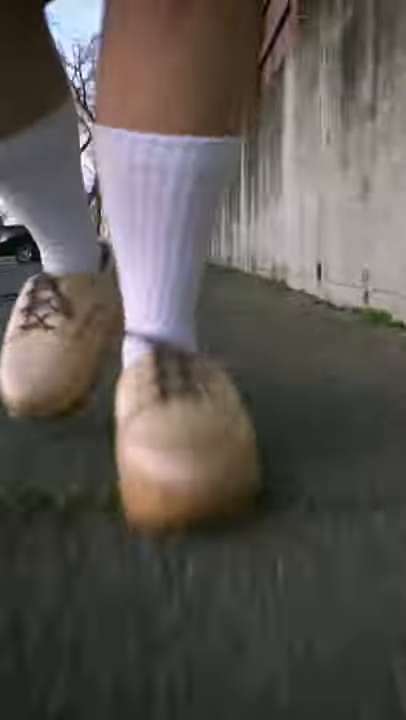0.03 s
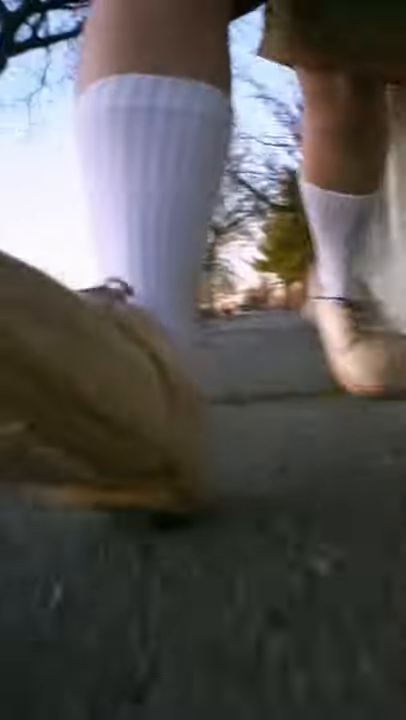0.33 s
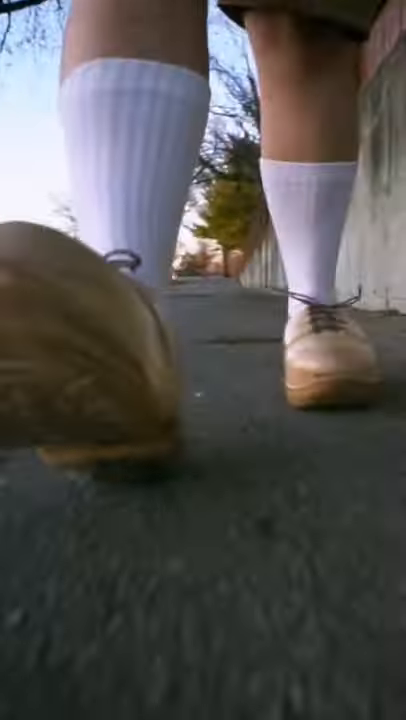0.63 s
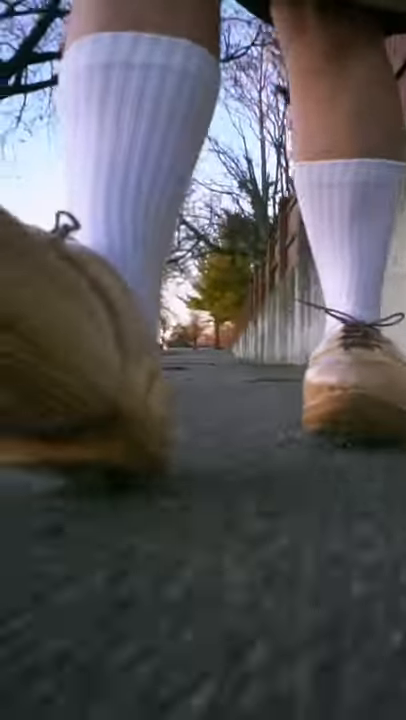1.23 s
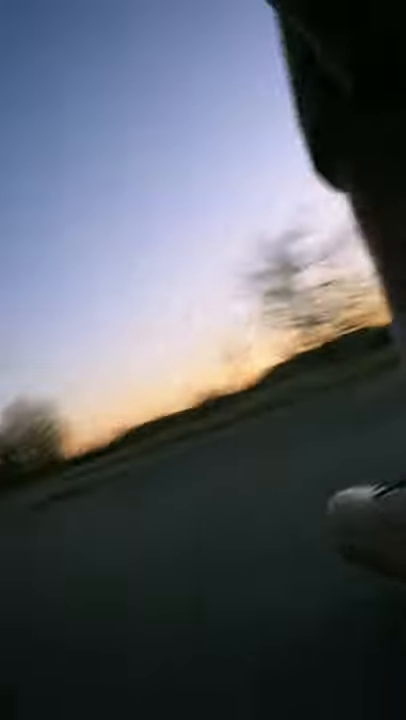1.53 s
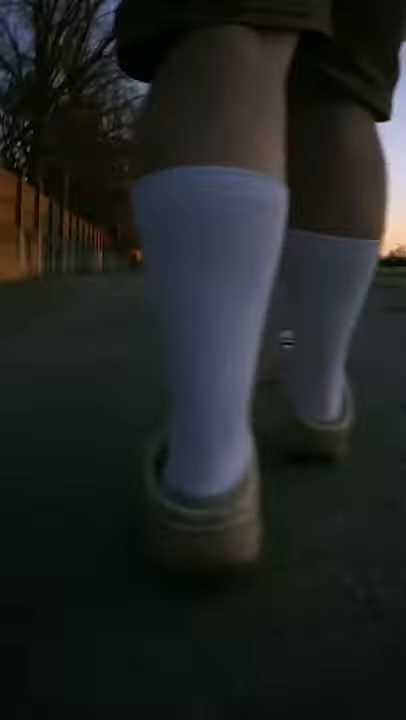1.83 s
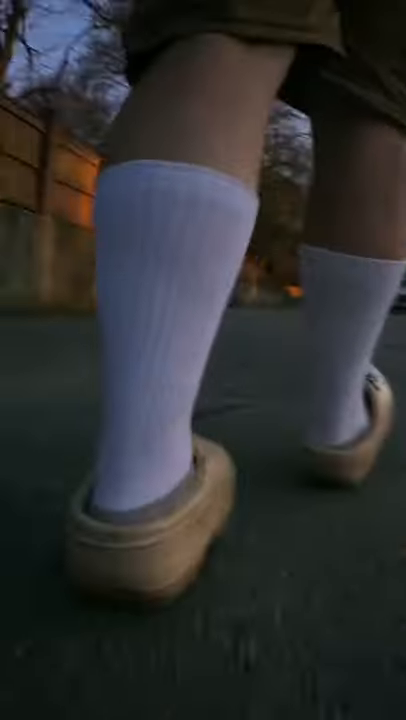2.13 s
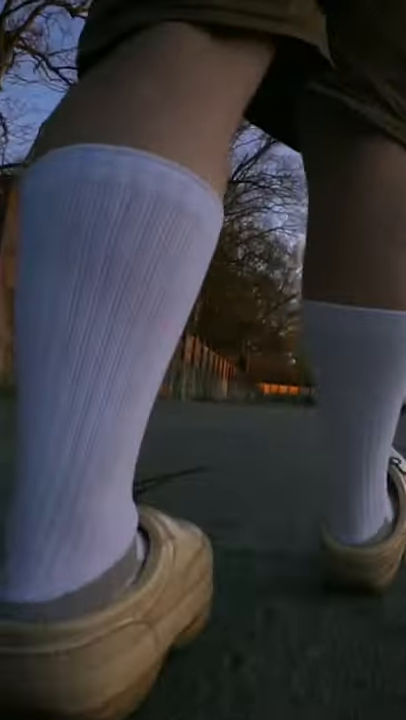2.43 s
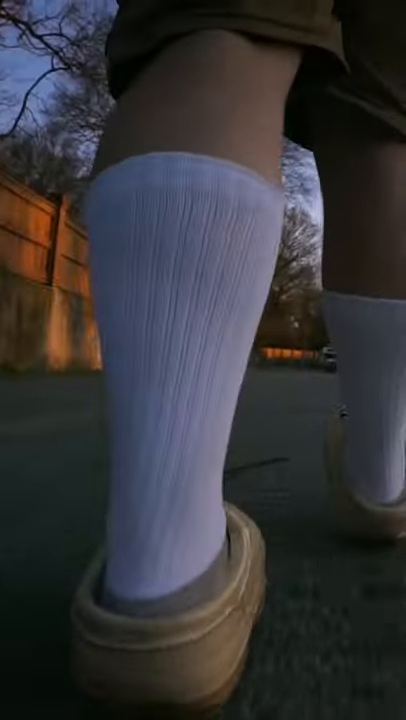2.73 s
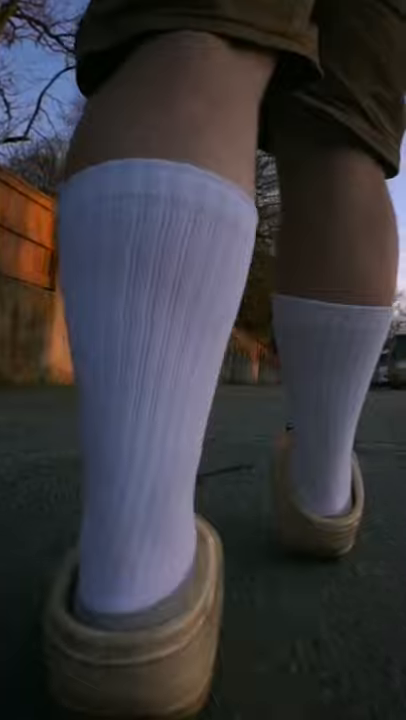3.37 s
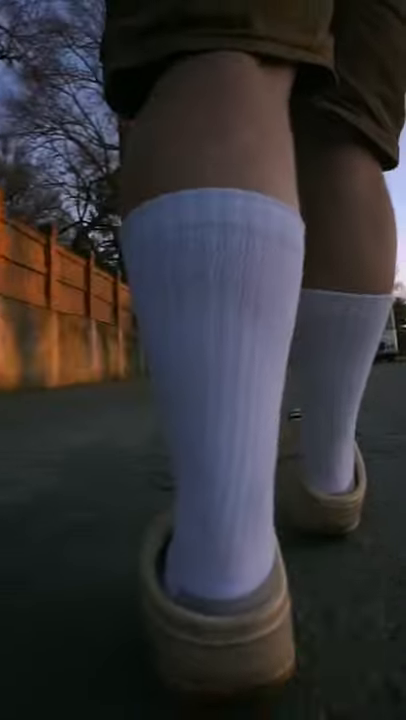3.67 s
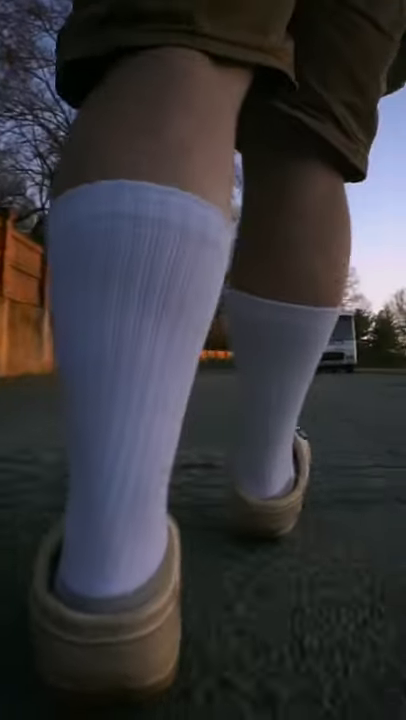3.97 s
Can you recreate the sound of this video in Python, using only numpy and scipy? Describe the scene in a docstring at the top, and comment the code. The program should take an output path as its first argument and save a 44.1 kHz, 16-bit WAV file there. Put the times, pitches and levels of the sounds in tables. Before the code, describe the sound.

Wheeled shoes clack down and roll along asphalt, with low wind rumble on the microphone.

```python
"""An asphalt street, the microphone low beside coasting shoes with heel wheels: first in front, then behind.
The wheels clack down, the hollow heels thump under the rider's weight and a rubber sole scuffs.
The road's grain drums the heels, rings the wheels and hisses under the tread; grit snaps and a dry
bearing chirps faintly. Air rumbles and buffets on the moving microphone, over a quiet street."""
import sys
import numpy as np
from scipy import signal
from scipy.fft import rfft, irfft, next_fast_len
from scipy.io import wavfile
from scipy.ndimage import uniform_filter1d, minimum_filter1d, map_coordinates

SR = 44100
rng = np.random.default_rng(int(sys.argv[2]) if len(sys.argv) > 2 else 0)


def master_out(mix):
    """Clip the mix to full scale and print it as 16-bit PCM to the path in sys.argv[1]."""
    frames = np.transpose(np.atleast_2d(mix))
    ceiling = np.clip(frames, -1, 1)
    pcm = np.round(ceiling * 32767).astype(np.int16)
    wavfile.write(sys.argv[1], SR, pcm)


N = 176400
SWING_S, SWING_LENGTH_S = 1.394, 0.23  # the microphone swings from in front to behind

# stereo width with the microphone in front and behind: f/Hz, side minus mid/dB
WIDTH_FRONT = [(80, -26), (300, -26), (750, -15), (2400, -8), (4500, -3), (12000, 1.5)]
WIDTH_BEHIND = [(80, -23), (250, -24), (700, -19), (2400, -24), (4500, -67), (8000, -10), (15000, -15)]
# spectrum of a snapping stone chip: f/Hz, gain/dB
CHIP_COLOUR = [(800, -32), (2500, 3), (5000, 3), (7500, 5), (10000, 2.5), (16000, -1)]


def amp(db):
    """Decibels to gain."""
    return 10 ** (np.asarray(db) / 20)


def along(points, hz):
    """Interpolate (f/Hz, value) points on a log frequency axis."""
    f, value = np.transpose(points)
    return np.interp(np.log(hz + 1), np.log(f + 1), value)


def hump(hz, centre_hz, octaves, peak_db):
    """The dB response of one resonance."""
    return peak_db / (1 + (np.log2((hz + 1) / centre_hz) / octaves) ** 2)


def curve(rows):
    """(t/s, value) rows as one value per sample."""
    return np.interp(np.arange(N) / SR, *np.transpose(rows))


def ramp(start, length):
    """A rise from 0 to 1; start and length in seconds."""
    return np.clip((np.arange(N) / SR - start) / length, 0, 1)


def arch(start, length):
    """A half sine from 0 up to 1 and back."""
    return np.sin(np.pi * ramp(start, length))


def wobble(rate):
    """A smooth random curve, rate knots a second."""
    return map_coordinates(rng.standard_normal(2048), [np.arange(N) * rate / SR], mode="wrap")


def panned(pan_db):
    """Left and right gains; pan is left minus right."""
    return amp([[pan_db / 2], [-pan_db / 2]])


def add(out, start, sound):
    """Mix a sound in at start seconds."""
    part = out[:, round(start * SR):][:, :sound.shape[1]]
    part += sound[:, :part.shape[1]]


def resonate(x, gain_db):
    """Pass x through a causal body with the given dB response."""
    n = x.shape[-1]
    size = 2 * next_fast_len(n // 2 + 2048)
    cepstrum = irfft(np.log(amp(gain_db(np.fft.rfftfreq(size, 1 / SR)))), size)
    cepstrum[1:size // 2] *= 2  # fold to minimum phase
    cepstrum[size // 2 + 1:] = 0
    return irfft(rfft(x, size) * np.exp(rfft(cepstrum)), size)[..., :n]


def voiced(pair, colour, width, tilt_db=0, modes=()):
    """Two excitations become a coloured stereo sound whose mid has rms 1."""
    def shade(hz):
        tilt = tilt_db * np.log2((hz + 100) / 1000)
        return along(colour, hz) + tilt + sum(hump(hz, *mode) for mode in modes)
    mid = resonate(pair[0], shade)
    side = resonate(pair[1], lambda hz: shade(hz) + along(width, hz))
    return np.array([mid + side, mid - side]) / np.std(mid)


def bumps(rate, spread_db):
    """Two trains of small random contacts of uneven size, rate a second."""
    hits = (rng.random((2, N)) < rate / SR) * rng.choice([-1, 1], (2, N))
    return hits * amp(spread_db * rng.standard_normal((2, N)))


def road_driven(front, behind, rate, spread_db):
    """Road bumps ring a part of the shoe, heard from in front and then behind as the microphone swings."""
    turn = ramp(SWING_S, SWING_LENGTH_S) * np.pi / 2
    from_front = voiced(bumps(rate, spread_db), front, WIDTH_FRONT)
    from_behind = voiced(bumps(rate, spread_db), behind, WIDTH_BEHIND)
    return np.cos(turn) * from_front + np.sin(turn) * from_behind


def snap(force, colour, ring_hz, octaves, peak_db, width):
    """A brief stereo crunch through a body with one strong resonance; width is side over mid."""
    crunch = rng.standard_normal((2, len(force))) * force
    mid, side = resonate(crunch, lambda hz: along(colour, hz) + hump(hz, ring_hz, octaves, peak_db))
    gain = np.linalg.norm(force) / (2 * np.linalg.norm(mid))
    return gain * np.array([mid + width * side, mid - width * side])


def air():
    """Air rumbles on the moving microphone."""
    # strength of the airflow: t/s, relative level/dB
    levels = [(0.0, -29), (0.05, -32.5), (0.26, -47), (0.3, -32.5), (0.49, -41.5), (1.3, -35.5),
              (1.37, -25), (1.48, -45), (1.56, -26), (1.65, -28.5), (2.02, -27.5), (2.08, -32.5),
              (2.14, -27), (3.17, -35), (3.71, -30.5), (4.0, -38)]
    # rumble spectrum: f/Hz, gain/dB
    colour = [(20, -53), (45, -3.5), (80, 1), (135, 4.5), (180, -6.5), (300, -12), (600, -40), (1500, -86)]
    return amp(curve(levels) - 1.5) * voiced(rng.standard_normal((2, N)), colour, WIDTH_BEHIND)


def street():
    """The quiet, steady background of the street."""
    # ambience spectrum: f/Hz, gain/dB
    colour = [(60, -8), (280, 0), (500, -13), (800, -23.5), (1800, -16), (3500, -23), (8000, -38),
              (15000, -56)]
    return amp(-46) * voiced(rng.standard_normal((2, N)), colour, width=[(100, -24), (2000, -8)])


def gusts():
    """Lumpy turbulence buffets each of the two microphone ports separately."""
    # gusts: t/s, length/s, relative level/dB
    puffs = [(-.1, 0.31, -38.5), (1.656, 0.31, -28), (2.003, 0.46, -25), (2.393, 0.53, -36.5)]
    # buffeting spectrum: f/Hz, gain/dB
    colour = [(25, -7), (70, 1), (160, -1.5), (260, 0.5), (420, -10), (750, -18.5), (1100, -34),
              (1600, -43), (4000, -51)]
    swell = sum(amp(db) * arch(start, length) for start, length, db in puffs)
    ports = resonate(rng.standard_normal((2, N)), lambda hz: along(colour, hz))
    lumps = amp(3 * np.array([wobble(73), wobble(73)]))
    return amp(-4) * swell * lumps * ports / np.std(ports)


def tread_hiss():
    """The asphalt's grain hisses under the tread, with ticks of fine grit."""
    # strength of the hiss: t/s, level/dB
    levels = [(0.0, -58), (0.14, -54), (0.39, -49.5), (0.57, -51.5), (0.77, -54), (0.96, -54),
              (1.19, -54.5), (1.45, -52), (1.61, -53), (2.02, -53.5), (2.47, -48), (2.62, -45), (2.8, -47),
              (3.22, -47.5), (3.6, -47), (4.0, -51)]
    # tread spectrum: f/Hz, gain/dB
    colour = [(1500, 5), (3500, -2.5), (6200, 4), (8000, 10), (10000, 8.5), (12500, 1), (15500, 4.5)]
    hiss = road_driven(colour, colour, rate=13000, spread_db=4.5) * amp(1.8 * wobble(110))
    specks = bumps(rate=40, spread_db=4)[0]
    dust = amp(-5) * voiced([specks, specks], CHIP_COLOUR, WIDTH_BEHIND)
    return amp(curve(levels)) * (hiss * panned(-2.8) + dust)


def clacks():
    """The wheels land and knock in their sockets."""
    # knocks: t/s, relative level/dB, ring f/Hz, pan/dB
    knocks = [(.185, -7.5, 1720, -1.5), (0.1977, -13.5, 2450, -11), (0.205, -15, 2700, 4),
              (0.232, -18, 2160, -6), (0.249, -15, 1810, 4), (0.27, -21.5, 2860, -6),
              (0.431, -20, 2290, -9), (0.45, -14.5, 4000, -1), (0.4902, -10, 1790, -3),
              (.582, -17.5, 2080, -2), (0.647, -14, 800, -3), (.659, -17, 950, -2), (0.725, -22, 2400, -9),
              (0.749, -20, 1900, -2.5), (0.773, -18, 884, -2), (.845, -22, 2170, -7),
              (0.924, -25.5, 2700, -3), (.970, -15.5, 744, -7.5), (1.004, -21.5, 850, -7),
              (1.0235, -16.5, 800, -7), (1.114, -20.5, 2370, -2.5), (1.415, -12, 1710, 16),
              (1.44, -24, 1000, 14), (1.454, -19, 2150, 21.5), (1.576, -17, 1640, 8),
              (1.591, -24, 2290, 21), (1.6434, -16, 2055, 7), (2.7475, -15, 4800, -2),
              (2.7499, -8.5, 2000, -3.5), (2.775, -30, 2300, -9), (2.974, -22.5, 1490, -2),
              (3.183, -21, 3900, -3), (3.809, -16.5, 2950, -3)]
    # knock spectrum: f/Hz, gain/dB
    colour = [(100, 5.5), (300, 12.5), (550, -2.5), (1500, -3.5), (3000, -8.5), (5200, -12.5), (7000, -19),
              (16000, -26)]
    attack_s, t60_s = 0.00052, 0.018
    out, t = np.zeros((2, N)), np.arange(SR // 10) / SR
    force = (1 - np.exp(-t / attack_s)) * amp(-60 * t / t60_s)
    for start, db, hz, pan_db in knocks:
        knock = snap(force, colour, hz, octaves=0.4, peak_db=15.5, width=0.15)
        add(out, start, amp(db + 3) * panned(pan_db) * knock)
    return out


def echo(x, t60_s=0.08):
    """Ground and wall scatter a short, faint tail."""
    t = np.arange(SR // 4) / SR
    tail = rng.standard_normal((2, len(t))) * amp(-60 * t / t60_s)
    return amp(-22) * signal.fftconvolve(x, tail / np.linalg.norm(tail[0]), axes=1)[:, :N]


def thumps():
    """The hollow heel booms briefly as the rider's weight drops on it."""
    # heel booms: t/s, level/dB, f/Hz
    booms = [(.186, -19, 310), (.206, -14, 253), (0.261, -20, 252), (.272, -14, 247), (.97, -27.5, 540),
             (1.0235, -26, 573), (1.426, -9, 216), (1.546, -14.5, 200), (1.567, -11, 140),
             (1.594, -18, 224), (1.648, -14.5, 222), (2.735, -12.5, 222)]
    attack_s, t60_s = 0.00089, 0.1
    out, t = np.zeros((2, N)), np.arange(SR // 5) / SR
    envelope = (1 - np.exp(-t / attack_s)) * amp(-60 * t / t60_s)
    for start, db, hz in booms:
        add(out, start, amp(db) * envelope * np.sin(2 * np.pi * hz * t[None]))
    return out


def heel_drone():
    """The asphalt's grain drums the hollow heels; the rider's weight keeps the drone even."""
    # strength of the drone: t/s, relative level/dB
    levels = [(0.18, -23), (0.21, -22.5), (0.24, -36.5), (0.27, -21), (0.47, -31), (0.5, -25.5),
              (0.76, -27), (0.81, -34), (0.97, -27), (1.04, -31), (1.4, -29), (1.43, -20.5), (1.48, -31.5),
              (1.63, -18.5), (1.72, -25), (2.02, -25), (2.06, -27.5), (2.37, -25), (2.39, -30.5),
              (2.45, -22.5), (2.5, -24), (2.64, -21.5), (2.85, -26.5), (2.87, -21.5), (3.13, -25),
              (3.2, -31), (3.22, -24.5), (3.73, -22.5), (3.88, -29.5), (4.0, -22)]
    # heel spectrum from in front and from behind: f/Hz, gain/dB
    front = [(100, -33.5), (180, -12.5), (260, 1.5), (305, 1), (370, -6.5), (460, -13), (600, -16),
             (900, -22.5), (1300, -29.5), (2500, -57)]
    behind = [(100, -25), (172, -11), (205, -1), (255, -0.5), (300, -5.5), (370, -15), (470, -23),
              (650, -24.5), (950, -33), (1400, -38), (2500, -48.5)]
    drone = road_driven(front, behind, rate=900, spread_db=2)
    power = abs(uniform_filter1d(drone.mean(0) ** 2, size=2400))
    return amp(curve(levels)) * drone / np.sqrt(power + 0.027) * panned(-0.6)


def wheel_ring():
    """The asphalt's grain sets the wheels ringing unsteadily."""
    # strength of the ring: t/s, level/dB
    levels = [(0.18, -32), (0.24, -38), (0.37, -41), (0.45, -41), (0.82, -45), (1.32, -45), (1.59, -46),
              (1.72, -44.5), (1.88, -48.5), (2.65, -42), (3.28, -45.5), (3.63, -44.5), (3.81, -48.5),
              (4.0, -45)]
    # wheel spectrum from in front and from behind: f/Hz, gain/dB
    front = [(700, -18), (1500, -10.5), (2050, 2), (2450, 1.5), (3300, -24), (4900, -14.5), (6500, -47)]
    behind = [(700, -9), (1450, -8.5), (1950, 5.5), (2500, -0.5), (3800, -11), (4900, -3), (6000, -19.5),
              (8000, -47)]
    ring = road_driven(front, behind, rate=2500, spread_db=4.5) * amp(1.3 * wobble(18))
    return amp(curve(levels)) * ring * panned(-2.8)


def scuffs():
    """A rubber sole drags in a rattle of tiny slips that ring the shoe."""
    # drags: t/s, length/s, level/dB, tilt/(dB per octave), ring f/Hz, pan/dB
    drags = [(0.211, 0.028, -33.5, -5.5, 2580, -2), (0.292, 0.034, -41, -2.5, 830, -6),
             (0.443, 0.021, -28, -0.5, 3950, -4), (0.489, 0.053, -24, -2, 1813, 0),
             (0.548, 0.082, -28.5, -5, 888, -1.5), (0.641, 0.012, -21.5, -6, 1005, -4),
             (0.669, 0.11, -29.5, -8.5, 963, -3), (1.429, 0.04, -29, -6, 984, 4),
             (1.475, 0.084, -37, -3.5, 1740, 7.5), (1.54, 0.042, -35.5, -5, 1675, 5)]
    # sole spectrum: f/Hz, gain/dB
    colour = [(150, -45.5), (340, 4.5), (600, -1), (1150, -5.5), (1600, -1), (2600, -7), (3300, -8),
              (6000, -15), (10000, -11), (16000, -19)]
    # sole resonances: f/Hz, half-width/octaves, peak/dB
    modes = [(805, 0.023, 11), (2620, 0.11, 9.5), (5020, .04, 11)]
    attack_s, release_s = 0.002, 0.013
    out = np.zeros((2, N))
    for start, length, db, tilt_db, hz, pan_db in drags:
        stroke = ramp(start, attack_s) * (1 - ramp(start + length, release_s))
        slips = bumps(rate=3000, spread_db=5.5) * amp(3.1 * wobble(220))
        scrape = voiced(slips, colour, WIDTH_FRONT, tilt_db, modes + [(hz, 0.05, 14)])
        out += amp(db) * stroke * scrape * panned(pan_db)
    return out


def grit():
    """Small stones crumble under the wheels and give way with one sharp crack."""
    # stones: t/s, relative level/dB, ring f/Hz, pan/dB
    stones = [(0.2965, -22.5, 9200, 1), (0.4325, -14, 8700, -8), (0.5273, -22, 6540, 0.5),
              (0.5824, -17, 8150, -1), (0.628, -31, 5900, -3.5), (0.684, -17, 6800, -10.5),
              (0.7547, -19, 6800, -10), (0.7794, -25, 8500, -7), (1.113, -20.5, 14500, -2.0),
              (1.1396, -30, 10600, -10), (1.1978, -22.5, 8240, -3), (1.2583, -27.5, 10000, -15),
              (1.2885, -31, 9500, -11), (1.3663, -30, 8560, 7), (1.4149, -21.5, 10400, 4.0),
              (1.534, -20.5, 14600, 7), (1.544, -28, 7400, 10), (1.6176, -27, 5800, 18),
              (1.6603, -22, 7610, 5), (1.6762, -21.5, 10400, 13), (1.928, -19, 10800, 0),
              (1.9764, -24, 9350, -3), (2.1015, -19, 9400, -11), (2.2797, -18.5, 12500, 1),
              (2.8467, -16, 9350, -4), (2.9027, -27, 10200, 1), (2.9564, -21, 11100, 1),
              (3.017, -27, 13800, 1), (3.1921, -2, 13000, -3), (3.3754, -23.5, 11600, -6),
              (3.5603, -26.5, 9600, 1), (3.5972, -23.5, 10200, 0), (3.6892, -20.5, 9300, 0),
              (3.793, -20, 9200, 0), (3.8117, 0, 11100, -2.0), (3.8415, -29, 6800, -0.5),
              (3.9388, -25, 9600, -3.0)]
    lead_s, crumble_t60_s = 0.002, 0.027
    crack_delay_s, crack_decay_s = 0.0007, 0.00025
    out, t = np.zeros((2, N)), np.arange(SR // 20) / SR - lead_s
    crumble = amp(-20 - 60 * abs(t) / crumble_t60_s)
    crack = np.exp(-abs(t - crack_delay_s) / crack_decay_s)
    for start, db, hz, pan_db in stones:
        width = 0.59 if start < SWING_S + SWING_LENGTH_S else 0.31  # narrower from behind
        stone = snap(crack + crumble, CHIP_COLOUR, hz, octaves=0.36, peak_db=12.5, width=width)
        add(out, start - lead_s, amp(db + 4) * panned(pan_db) * stone)
    return out


def bearing():
    """A dry bearing gives thin, unsteady chirps."""
    # chirps: t/s, length/s, level/dB
    chirps = [(2.78, .04, -55), (2.875, .025, -54), (2.945, .04, -49)]
    level = sum(amp(db) * arch(start, length) for start, length, db in chirps)
    flutter = amp(3 * wobble(220))
    hz = 11300 + 40 * wobble(200)
    return level * flutter * np.sin(2 * np.pi * np.cumsum(hz) / SR)


def scene():
    """Everything that reaches the microphone, low beside the shoes."""
    contacts = scuffs() + clacks()
    landed = ramp(0.195, 0.0083)  # the wheels meet the road
    rolling = landed * (heel_drone() + wheel_ring()) + tread_hiss()
    dip = amp(-7 * arch(2.752, 0.026))  # after one hard wheel clack the rolling sound dips briefly
    shoes = dip * rolling + contacts + echo(contacts) + thumps() + grit() + bearing()
    return shoes + air() + street() + gusts()


def record(dry):
    """A quick limiter holds the peaks down; nothing is kept above the band limit."""
    threshold_db, top_hz = -11.5, 15900
    needed_gain = np.minimum(1, amp(threshold_db) / (abs(dry.mean(0)) + 1e-9))
    gain = uniform_filter1d(minimum_filter1d(needed_gain, size=200), size=200)
    size = next_fast_len(N + 8192)
    passband = np.fft.rfftfreq(size, 1 / SR) < top_hz
    return irfft(rfft(dry * gain, size) * passband, size)[:, :N]


dry = scene()
out = record(dry)
master_out(out)
```